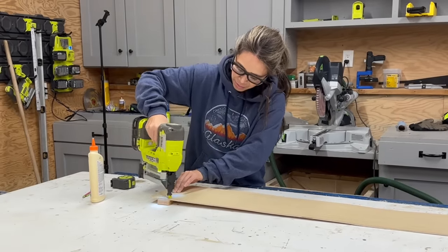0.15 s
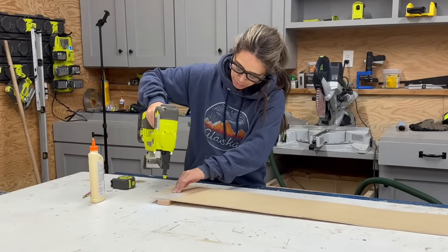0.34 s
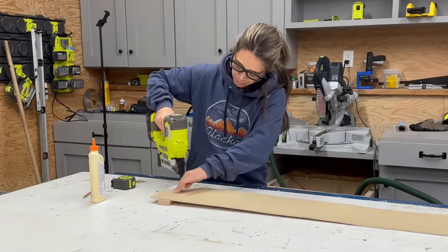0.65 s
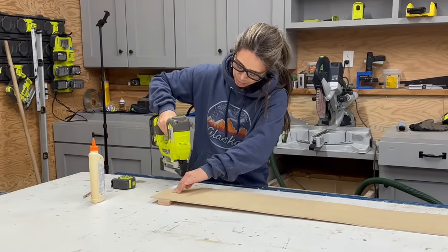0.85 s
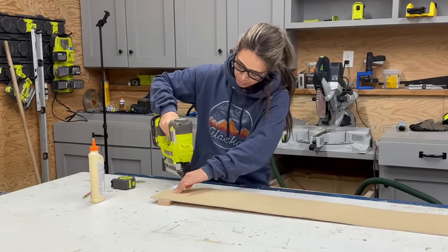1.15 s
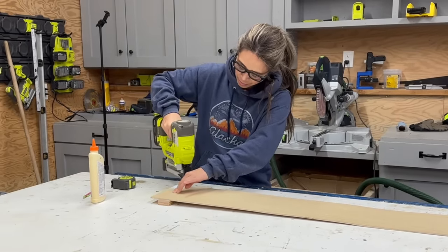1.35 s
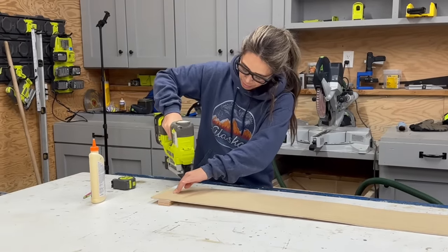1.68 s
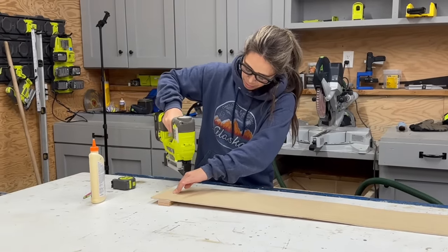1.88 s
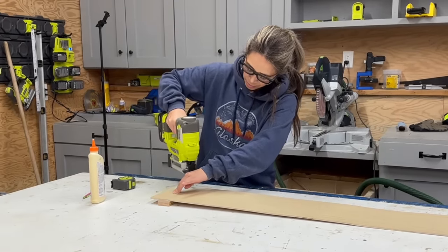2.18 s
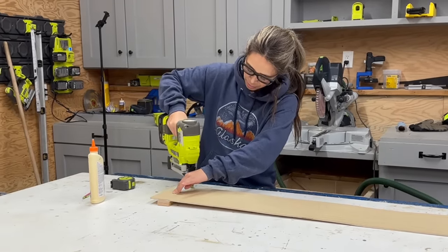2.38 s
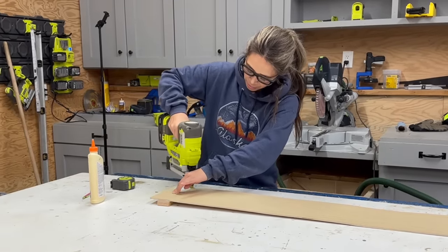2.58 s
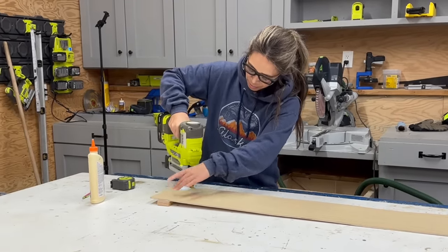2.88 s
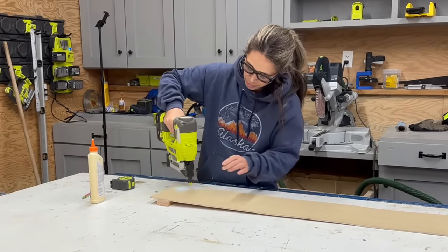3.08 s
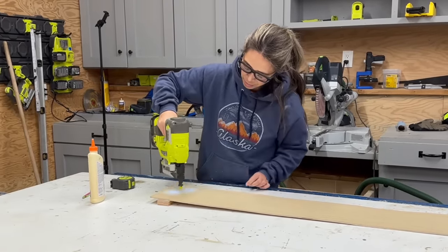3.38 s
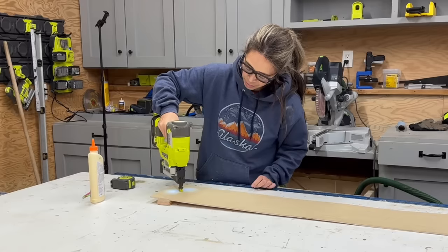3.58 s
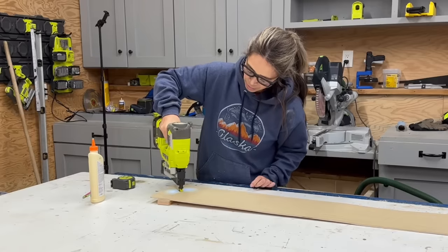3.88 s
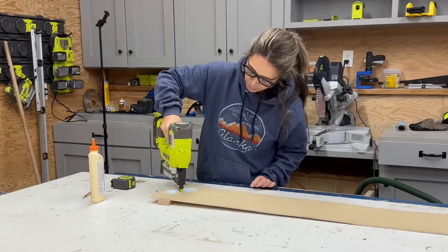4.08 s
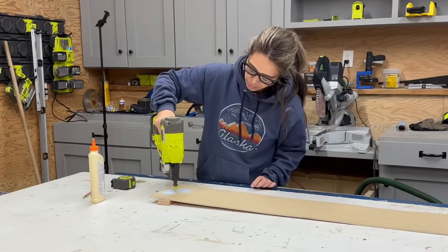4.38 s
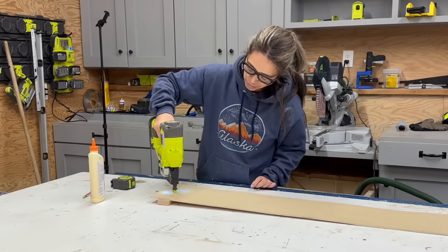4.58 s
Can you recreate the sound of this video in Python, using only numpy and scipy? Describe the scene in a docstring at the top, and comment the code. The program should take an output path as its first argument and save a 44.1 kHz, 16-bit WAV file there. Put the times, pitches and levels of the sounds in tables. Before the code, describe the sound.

In a quiet home workshop, a powered stapler drives staples through a wooden strip into thin plywood. Soft wooden knocks and rattles precede each click, short straining motor whine and sharp, booming bang; a hard metallic clack and a looser whir follow. Three full shots after a leftover tail, closely miked with short room reflections and slight clipping.

```python
"""The end of one staple shot, the piston's clack and the motor running out; then three more full cycles.
Each cycle: the nose knocks on a wooden strip over plywood on a hollow bench (struck modes, coloured bursts),
the trigger clicks, a geared motor winds up (noise, gear resonances, hum), the driver whistles and slams home
(noise cracks, diving snaps, bench modes), the piston clacks back, the motor runs out and coasts.
The workshop answers with sparse reflections over a quiet hush; a close microphone pair overloads on the shots."""
import sys
import numpy as np
from scipy import signal
from scipy.fft import rfft, irfft, next_fast_len
from scipy.io import wavfile
from scipy.ndimage import uniform_filter1d

SR = 44100
rng = np.random.default_rng(int(sys.argv[2]) if len(sys.argv) > 2 else 0)


def digitize_waveform(pressure):
    """Quantize a signal to 16-bit integers and store it at the path in sys.argv[1].

    Rows of a 2-D input are taken as channels; values are limited to [-1, 1].
    """
    field = np.atleast_2d(pressure).T
    bounded = np.clip(field, -1, 1)
    quanta = np.round(bounded * 32767).astype(np.int16)
    wavfile.write(sys.argv[1], SR, quanta)


N = 209122
LEAD = SR // 10  # samples computed ahead of time zero, then cut off
M = N + LEAD

# All levels are relative gains ahead of the mix. Spectra are per Hz, interpolated over log frequency.

# Driver seats the staple: (time [s], strength [dB], bench thump re strength [dB], low boom [dB],
# first touch re strength [dB], low whistle [dB], high whistle [dB])
SHOTS = [(-.045, 0.02, -5.5, -14, -7.5, -20, -14.5), (1.6617, 1.86, -2, -10.5, -10, -25.5, -25),
         (2.771, 1.56, -4.5, -9.5, -11, -26, -11), (4.037, 0.36, -0.5, -6, 2.5, -16, -14.5)]
# Nose bounces on the strip: (time after shot [s], level re strength [dB])
REBOUNDS = [(.014, -5), (0.022, -11.5), (0.04, -4.5)]
# Driver crack: (frequency [Hz], level [dB])
CRACK_SPECTRUM = [(300, -0.5), (2000, -7.0), (6500, -1.5), (11000, -4.5), (15000, -0.5)]
# Wood and tool rattle after the shot: (frequency [Hz], level [dB])
SHOT_SPECTRUM = [(45, -30), (75, -2.5), (240, -3.5), (345, 2), (663, -9.5), (745, -4), (940, -8),
                 (1130, -4.5), (1430, -7), (1890, -15), (3090, -21), (6670, -23.5), (11100, -37),
                 (13700, -32), (15800, -34.5)]
# Its decay: (frequency [Hz], t60 [s])
SHOT_T60 = [(60, 0.25), (300, 0.2), (1500, 0.26), (5000, 0.49), (14000, 0.84)]
# Low boom of the shot: (frequency [Hz], level [dB]), then (frequency [Hz], t60 [s])
BOOM_SPECTRUM = [(70, -20.5), (110, -0.5), (190, -4.5), (260, -14), (400, -32)]
BOOM_T60 = [(100, 0.21), (250, .3)]
# Bench modes: (frequency [Hz], level [dB], t60 [s])
BENCH_MODES = [(60, -10, 0.82), (78.8, 5, 0.31), (109.5, -9, 0.62), (121.4, -5.5, 0.22), (186.9, 1.5, 0.16),
               (210.4, -9, 0.54), (231.5, -2, 0.18), (314.6, -7.5, 0.24), (329.8, -9.5, 0.2),
               (443.2, -12.5, 0.33), (500, -4.5, 0.018), (725, -14, .07), (770, -16, 0.07),
               (1370, -18, 0.047), (2000, -15.5, 0.033)]

# Motor compresses the air spring: (start [s], release [s], full whirr [dB], full hum [dB], hum full at [s])
WINDUPS = [(1.452, 1.662, -18, -35.5, 1.57), (2.552, 2.771, -16.5, -25.5, 2.655),
           (3.822, 4.032, -17, -21.5, 3.915)]
# Gear speed dips, recovers and sags under the rising pressure; the hum climbs, then sags:
# (time before release [s], speed [0-1], mean hum frequency [Hz])
STROKE = [(0, .82, 291), (0.018, .87, 319), (.04, .94, 336), (.065, 1, 345), (0.113, 0.93, 328.7),
          (0.141, 0.92, 275), (.21, 1, 198.7)]
# Whirr under load: (frequency [Hz], level [dB])
LOADED_SPECTRUM = [(200, -10), (400, -6), (775, -12), (1050, -5.5), (1800, -11.5), (2600, -17.5),
                   (4000, -8.5), (4750, -12.5), (6600, -14), (9500, -6.5), (11000, -39.5), (12500, -8),
                   (15800, -12)]
# Gear whine: (frequency at full speed [Hz], width [Hz], level [dB])
MESH = [(570, 15.4, -7.5), (1080, 330, -13.5), (3120, 170, -6), (4144, 140, -7.5), (6880, 400, -3)]

# Piston hits its stop: (time [s], strength [dB], housing ring re strength [dB])
CLACKS = [(.098, -2.5, 3.5), (1.810, -7, 0.5), (2.913, -0.5, -6), (4.173, -1, -3.5)]
# Clack noise: (frequency [Hz], level [dB]), then (frequency [Hz], t60 before the grip damping [s])
CLACK_SPECTRUM = [(59, -28), (100, -24), (295, -5), (431, -14.5), (687, -24), (1410, -14.5), (2070, -14),
                  (2560, -16.5), (3510, -16), (4830, -27.5), (6780, -18), (10300, -17.5), (11300, -57),
                  (12300, -14), (15800, -17)]
CLACK_T60 = [(300, 0.15), (3000, 0.27), (14000, 0.019)]
# Housing modes: (frequency [Hz], level [dB], t60 before the grip damping [s])
HOUSING_MODES = [(423.3, 1.5, 0.37), (427.5, 2, 0.33), (774, -9.5, 0.2), (1934, -2, 0.14),
                 (2040, -8.5, 0.25), (2180, -15, 0.091), (2590, -26.5, 0.11), (2860, -7.5, 0.13),
                 (3360, -11, 0.096)]

# Motor draws the piston back: (start [s], power cut [s], whirr [dB], coasting fade [dB per s])
RETURNS = [(0, .26, -26.5, 276), (1.701, 1.987, -23, 215), (2.811, 3.113, -26, 134),
           (4.071, 4.375, -24.5, 117)]
# Whirr running free: (frequency [Hz], level [dB])
FREE_SPECTRUM = [(60, -45), (100, -9.5), (254, -11), (415, 1), (593, -9), (1070, -3.5), (2610, -5),
                 (7200, -23), (9300, -25), (11000, -59.5), (12800, -36), (15800, -35.5)]

# Nose set down or lifted, strip knocked on the bench: (time [s], blow [dB], weight behind it [dB],
# plywood rattle [dB], steel nose tick [dB], scrape [dB])
KNOCKS = [(1.091, -35, -2, -38, -42.5, -61), (1.310, -44.5, -21, -52.5, -54, -56),
          (1.338, -27, 0.5, -43, -50, -44), (2.299, -24.5, -6.5, -30, -43.5, -48),
          (2.496, -23, 4, -30, -39, -41), (3.496, -26.5, -4, -25, -38.5, -40.5),
          (3.743, -22, 3, -22, -39.5, -35), (4.566, -27.5, -1.5, -26.5, -57, -45)]
# Plywood rattle: (frequency [Hz], level [dB]), then (frequency [Hz], t60 [s])
PLYWOOD_SPECTRUM = [(100, -21.5), (250, -4.5), (431, -4.5), (600, -5), (780, 0), (1150, -6.5), (1600, -6),
                    (2200, -22), (5000, -58)]
PLYWOOD_T60 = [(200, 0.31), (1000, 0.16)]
# Nose tick: (frequency [Hz], level [dB]), then (frequency [Hz], t60 [s])
NOSE_SPECTRUM = [(600, -29.5), (1300, -3.5), (2200, 1.5), (3300, -7.5), (4500, -29), (9000, -48.5)]
NOSE_T60 = [(1000, 0.13), (4000, 0.13)]
# Scrape: (frequency [Hz], level [dB]), then (frequency [Hz], t60 [s])
SCRAPE_SPECTRUM = [(2000, -13), (4000, -0.5), (7000, -4), (9500, -6.5), (15800, -22)]
SCRAPE_T60 = [(3000, 0.068), (9000, 0.057)]

# Trigger switch, then gears taking up play: (time [s], switch [dB], take-up [dB])
CLICKS = [(1.4422, -19, -22), (2.5448, -14, -11), (3.8152, -15.5, -13)]
# Both clicks: (frequency [Hz], level [dB]), then (frequency [Hz], t60 [s])
CLICK_SPECTRUM = [(300, -26.5), (1200, -7.5), (2200, -14.0), (3500, -1), (5200, -4.5), (6800, -4),
                  (15000, -3.0)]
CLICK_T60 = [(1000, 0.049), (9000, 0.013)]

# Reflection decay: (frequency [Hz], t60 [s])
SHOP_T60 = [(60, 1), (250, 0.59), (1000, 0.79), (3800, 0.78), (7000, 0.6), (11000, 0.27), (15000, 0.21)]
# Left-right likeness of the reflections: (frequency [Hz], likeness [0-1])
SHOP_LIKENESS = [(60, 1), (250, 0.88), (600, 0.11), (2000, 0.055), (8000, 0.81), (14000, 1)]
# Reflection level: (frequency [Hz], level [dB])
SHOP_LEVEL = [(60, -9), (130, -18), (250, -7), (420, -7), (800, -5.5), (2000, -5.5), (6000, -5.5),
              (14000, -4)]
# Still room: (frequency [Hz], level [dB])
HUSH_SPECTRUM = [(15, -23), (25, -12.5), (81, 5.5), (251, -6.5), (284, -12), (348, -9), (836, -22),
                 (1730, -28), (2720, -24), (5340, -39), (7040, -14), (8390, -21.5), (10000, -25.5),
                 (13000, -43), (22000, -120)]
# Parts of the treble narrow to the centre: (frequency [Hz], side gain [dB])
SIDE_GAIN = [(3000, 0.5), (7000, -3), (9500, -15), (11500, 0.5), (13000, -20)]

TOUCH_S = .0043  # driver meets the staple this long before seating it
SPINUP_DB, SPINUP_S = -17, 0.069  # initial whirr offset, time constant of its exponential recovery
HUM_RISE_DB_PER_S = 340.5  # until the housing is fully loaded
HUM_FADE_DB, HUM_FADE_S = -10, .04  # hum thins out just before the release
PICKUP_DB, PICKUP_S = -6, 0.28  # run-out whirr swells linearly in dB as the motor picks up speed
COAST_S = .12
DRONE_HZ, DRONE_WIDTH_HZ, DRONE_RE_WHIRR_DB = 420, 25, -10  # housing drone
TREBLE_EXTRA_FADE_DB_PER_S = 500  # whirr above 10 kHz gets an extra fade after the cut
TAKEUP_S = 0.018
SHOP_TURN_HZ = 2.3
HUSH_DB, HUSH_SIDE_RATIO = -66.5, 0.14
EDGE_HZ = 15900


def amp(db):
    """Turn dB into an amplitude factor."""
    return 10 ** (np.asarray(db) / 20)


def unit(x):
    """Scale to rms 1."""
    return x / np.sqrt(np.mean(x ** 2) + 1e-20)


def read(points, hz):
    """Interpolate a table over log frequency."""
    f, value = np.transpose(points)
    return np.interp(np.log(hz + 1), np.log(f + 1), value)


def add(mix, start_s, sound):
    """Add a sound to the mix at a time, cut at the end."""
    part = mix[round(start_s * SR) + LEAD:][:len(sound)]
    part += sound[:len(part)]


def noise(spectrum, size):
    """Noise of rms 1 with the given colour."""
    bins = rfft(rng.standard_normal(size))
    gain = amp(read(spectrum, np.fft.rfftfreq(size, 1 / SR)))
    return unit(irfft(bins * gain, size))


def burst(spectrum, t60, rise_s):
    """Coloured noise with a linear rise, each band dying at its own speed."""
    hz, t, bins = signal.stft(noise(spectrum, SR // 2), SR, nperseg=256, noverlap=192)
    decay = amp(-60 * t / read(t60, hz)[:, None])
    x = signal.istft(bins * decay, SR, nperseg=256, noverlap=192)[1]
    return x * np.minimum(np.arange(len(x)) / SR / rise_s, 1)


def ring(modes, lag_cycles, weight_db=0):
    """Struck body of dying sines: bending waves bring low modes late; weight sets those below 110 Hz."""
    hz, db, t60 = np.transpose(modes)[:, :, None]
    t = np.maximum(np.arange(SR) / SR - lag_cycles / hz, 0)
    hit_db = rng.standard_normal((len(modes), 1))
    level_db = db + hit_db + weight_db * (hz < 110) - 60 * t / t60
    onset = 1 - np.exp(-t * hz / 0.36)
    return (amp(level_db) * np.sin(2 * np.pi * hz * t) * onset).sum(0)


def resonate(x, hz, width_hz):
    """Resonance of peak gain near 1 that follows the curve hz: shift to 0 Hz, low-pass, shift back."""
    turn = np.exp(2j * np.pi * np.cumsum(hz) / SR)
    r = np.exp(-np.pi * width_hz / SR)
    return 2 * (turn * signal.lfilter([1 - r], [1, -r], x / turn)).real


def snap(top_hz, low_hz, fall_s):
    """Blow through a plate: the treble of the bending wave arrives first, so the pitch dives."""
    t = np.arange(SR // 20) / SR
    hz = low_hz + (top_hz - low_hz) * np.exp(-(t / fall_s) ** 3)
    return np.sin(2 * np.pi * np.cumsum(hz) / SR) * np.exp(-t / 0.0082)


def shot(mix, s, db, thump_db, boom_db, touch_db, low_db, high_db):
    """The released driver whistles down its channel, cracks into the wood and bounces; strip and bench shake."""
    t = np.arange(0, .018, 1 / SR)
    for hz, whistle_db, before_s, length_s in ((2166, low_db, .019, .013), (4260, high_db, .015, .008)):
        tone = unit(resonate(rng.standard_normal(len(t)), hz + 0 * t, 50))
        swell = np.sin(np.pi * np.minimum(t / length_s, 1)) ** .5
        add(mix, s - before_s, amp(whistle_db) * tone * swell)

    crack_shape = np.exp(-(t / 0.0046) ** 4) * np.minimum(t / 0.0023, 1)
    for after_s, blow_db in [(-TOUCH_S, touch_db), (0, 3.0)] + list(REBOUNDS):
        add(mix, s + after_s, amp(db + blow_db) * noise(CRACK_SPECTRUM, len(t)) * crack_shape)

    add(mix, s - TOUCH_S, amp(db + touch_db - 5.5) * snap(900, 400, 0.0035))
    add(mix, s, amp(db + 2.0) * snap(2104, 316.4, 0.00392))
    add(mix, s + .004, amp(db - 2.5) * burst(SHOT_SPECTRUM, SHOT_T60, 0.013))
    add(mix, s + .004, amp(boom_db) * burst(BOOM_SPECTRUM, BOOM_T60, 0.0091))
    add(mix, s, amp(db - 8 + thump_db) * ring(BENCH_MODES, 1.3, -9.0))


def windup(start, end, full_db, hum_full_db, loaded_s):
    """Brush and gear noise, gear whine that follows the speed, and a hum of the loaded housing."""
    t = np.arange(start, end, 1 / SR)
    to_release = end - t
    whirr_db = full_db + SPINUP_DB * np.exp(-(t - start) / SPINUP_S)
    hum_db = hum_full_db - HUM_RISE_DB_PER_S * np.maximum(loaded_s - t, 0)
    hum_db += HUM_FADE_DB * np.maximum(1 - to_release / HUM_FADE_S, 0)

    before_s, *curves = np.transpose(STROKE)
    speed, hum_hz = (np.interp(to_release, before_s, c) for c in curves)
    mesh = sum(amp(db) * unit(resonate(rng.standard_normal(len(t)), hz * speed, width_hz))
               for hz, width_hz, db in MESH)
    strain = amp(-14.0 * to_release / 0.12)  # whine stands out as the load grows
    whirr = noise(LOADED_SPECTRUM, len(t)) + amp(2.0) * strain * mesh

    waver = 1 + 0.015 * unit(uniform_filter1d(rng.standard_normal(len(t)), 300))
    hum = np.sqrt(2) * np.sin(2 * np.pi * np.cumsum(hum_hz * waver) / SR)
    sound = amp(whirr_db) * whirr + amp(hum_db) * hum
    return start, sound * signal.windows.tukey(len(t), .05)


def clack(mix, s, db, ring_db):
    """The piston hits its stop; the housing rings until the gripping hand damps it."""
    t = np.arange(SR) / SR
    grip = 0.088 + np.exp(-(t / 0.039) ** 4)
    hit = burst(CLACK_SPECTRUM, CLACK_T60, .0006) * grip[:SR // 2 + 30]  # burst length
    add(mix, s, amp(db - 2.0) * hit)
    add(mix, s, amp(db - 4.0) * snap(2222, 408, 0.002447))
    add(mix, s, amp(db - 16 + ring_db) * ring(HOUSING_MODES, 0.015) * grip)


def runout(start, cut, db, fade_db_per_s):
    """The unloaded motor and gears whirr broadly until the power is cut, then coast out."""
    t = np.arange(start, cut + COAST_S, 1 / SR)
    coasting_s = np.maximum(t - cut, 0)
    pickup_db = PICKUP_DB * np.maximum(1 - (t - start) / PICKUP_S, 0)
    level_db = db + pickup_db - fade_db_per_s * coasting_s

    whirr = noise(FREE_SPECTRUM, len(t))
    treble = signal.sosfiltfilt(signal.butter(4, 10000, "high", fs=SR, output="sos"), whirr)
    whirr = whirr - treble * (1 - amp(-TREBLE_EXTRA_FADE_DB_PER_S * coasting_s))
    drone = unit(resonate(rng.standard_normal(len(t)), DRONE_HZ + 0 * t, DRONE_WIDTH_HZ))
    sound = amp(level_db) * (whirr + amp(DRONE_RE_WHIRR_DB) * drone)
    return start, sound * signal.windows.tukey(len(t), .05)


def knock(mix, s, db, weight_db, rattle_db, tick_db, scrape_db):
    """The bench booms, the loose plywood rattles, and the nose ticks and scrapes on the wood."""
    add(mix, s, amp(db + 2.0) * ring(BENCH_MODES, 0.97, weight_db))
    add(mix, s, amp(rattle_db) * burst(PLYWOOD_SPECTRUM, PLYWOOD_T60, .012))
    add(mix, s, amp(tick_db) * burst(NOSE_SPECTRUM, NOSE_T60, 0.0017))
    add(mix, s, amp(scrape_db) * burst(SCRAPE_SPECTRUM, SCRAPE_T60, .003))


def click(mix, s, switch_db, takeup_db):
    """The trigger switch snaps, and the gears knock once as they take up their play."""
    for after_s, db in ((0, switch_db), (TAKEUP_S, takeup_db)):
        add(mix, s + after_s, amp(db) * burst(CLICK_SPECTRUM, CLICK_T60, 0.0027))


def tail(x):
    """Sparse reflections of random sign, each band with its own decay and left-right likeness."""
    taps = np.zeros((2, SR))
    at = np.arange(120, SR - 20, 20) + rng.integers(0, 20, (2, (SR - 121) // 20))
    np.put_along_axis(taps, at, rng.choice([-1., 1.], at.shape), 1)
    taps *= 1 + 0.77 * np.exp(-np.arange(SR) / SR / 0.0041)  # bench top, cupboards, near wall answer first

    hz, t, bins = signal.stft(taps, SR, nperseg=512, noverlap=384)
    same = np.clip(read(SHOP_LIKENESS, hz), 0, 1)[:, None]
    right = same * bins[0] + np.sqrt(1 - same ** 2) * bins[1]
    bins = np.array([bins[0], right]) * amp(-60 * t / read(SHOP_T60, hz)[:, None])
    taps = signal.istft(bins, SR, nperseg=512, noverlap=384)[1]
    wet = signal.istft(bins * amp(read(SHOP_LEVEL, hz)[:, None]), SR, nperseg=512, noverlap=384)[1]
    # unit energy ahead of the level table
    return signal.fftconvolve(x[None], wet / np.linalg.norm(taps[0]), axes=1)[:, :M]


def shop(x):
    """Three reflection patterns take turns with sinusoidal gains, so no fixed colour stands out."""
    turn = 2 * np.pi * SHOP_TURN_HZ * np.arange(M) / SR
    return sum(tail(x * np.sqrt(2 / 3) * np.cos(turn + k * 2 * np.pi / 3)) for k in range(3))


def still_room():
    """Coloured noise, mostly central, with a weak independent side part."""
    side = HUSH_SIDE_RATIO * np.array([[1], [-1]]) * noise(HUSH_SPECTRUM, M)
    return amp(HUSH_DB) * (noise(HUSH_SPECTRUM, M) + side)


def scene():
    """Sum tool, reflections and hush in stereo; cut the lead."""
    tool = np.zeros(M)
    for play, rows in ((shot, SHOTS), (clack, CLACKS), (knock, KNOCKS), (click, CLICKS)):
        for row in rows:
            play(tool, *row)
    for row in WINDUPS:
        add(tool, *windup(*row))
    for row in RETURNS:
        add(tool, *runout(*row))
    return (amp(-1.0) * tool + shop(tool) + still_room())[:, LEAD:]


def record(dry):
    """Sound reaches the left port first, the deep bass is cut and the shots clip; then the band limit."""
    size = next_fast_len(N + 4096)
    hz = np.fft.rfftfreq(size, 1 / SR)
    lead = np.exp(1j * np.pi * hz * 46e-6)  # 46 us between the ports, half on each
    left, right = rfft(dry, size) * np.array([lead, 1 / lead])
    mid = (left + right) / 2
    side = (left - right) / 2 * amp(read(SIDE_GAIN, hz))
    x = irfft(np.array([mid + side, mid - side]), size)[:, :N]
    x = signal.sosfilt(signal.butter(3, 52, "high", fs=SR, output="sos"), x)
    x = x / (1 + abs(x) ** 12) ** (1 / 12)  # overload
    x = signal.oaconvolve(x, signal.firwin(511, EDGE_HZ, window=("kaiser", 9), fs=SR)[None], "same")
    return np.clip(x, -1, 1)


dry = scene()
out = record(dry)
digitize_waveform(out)
```